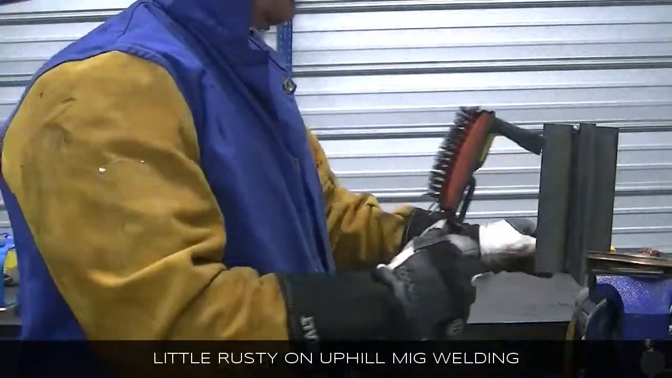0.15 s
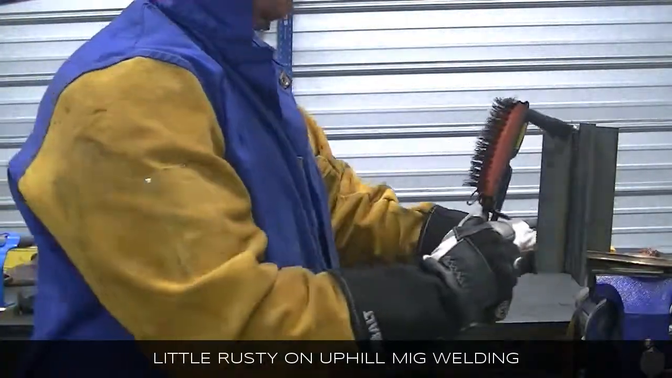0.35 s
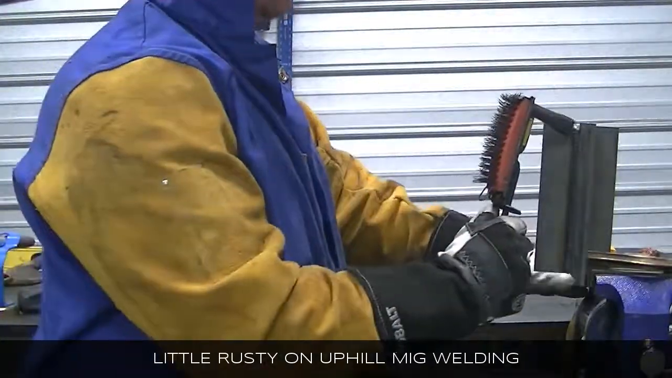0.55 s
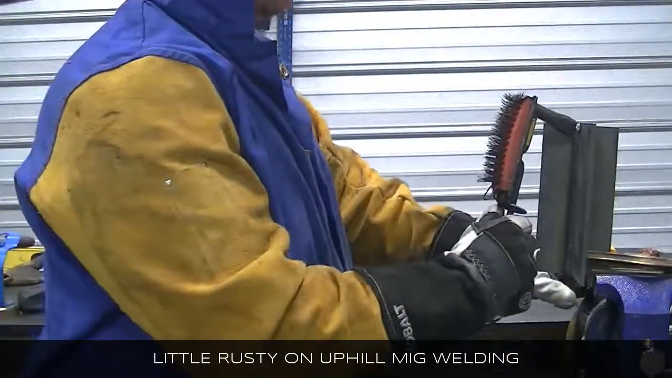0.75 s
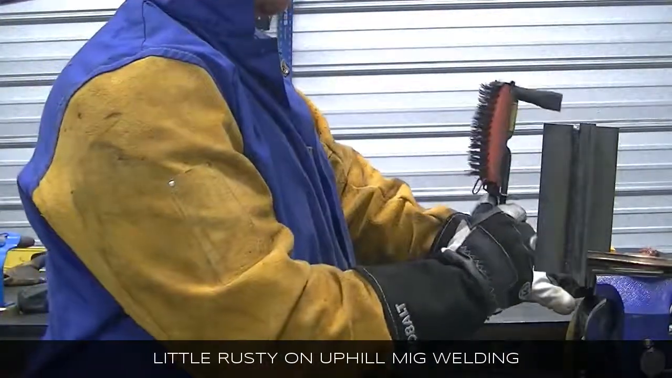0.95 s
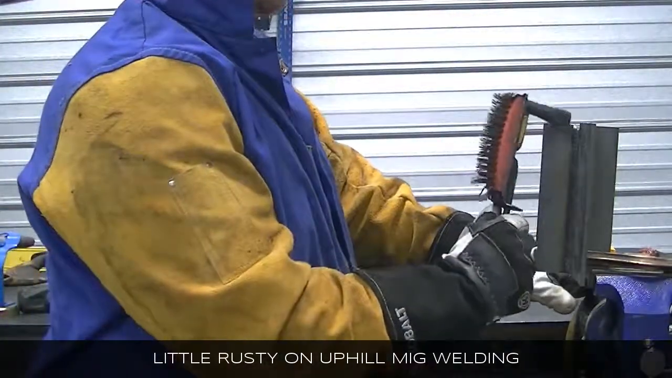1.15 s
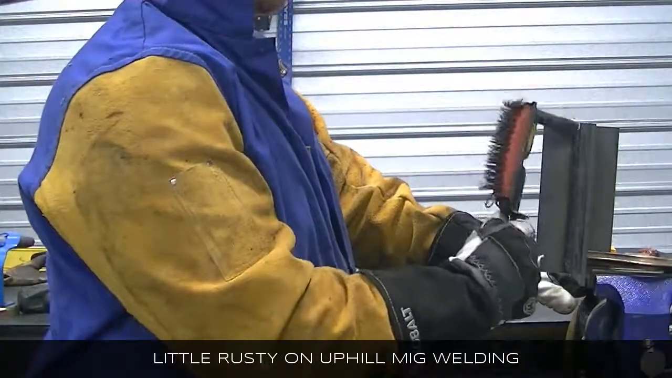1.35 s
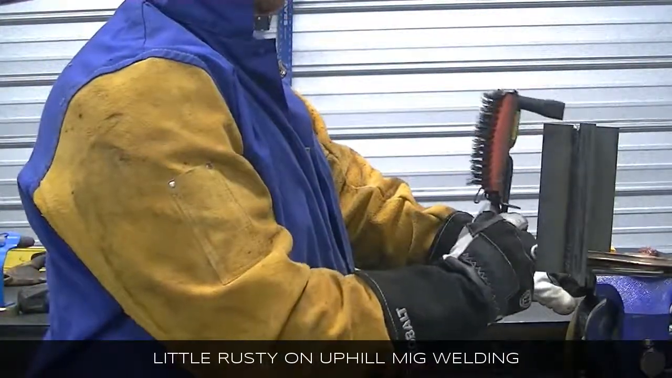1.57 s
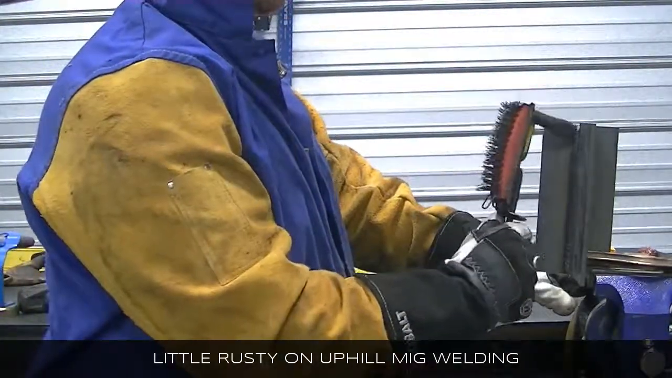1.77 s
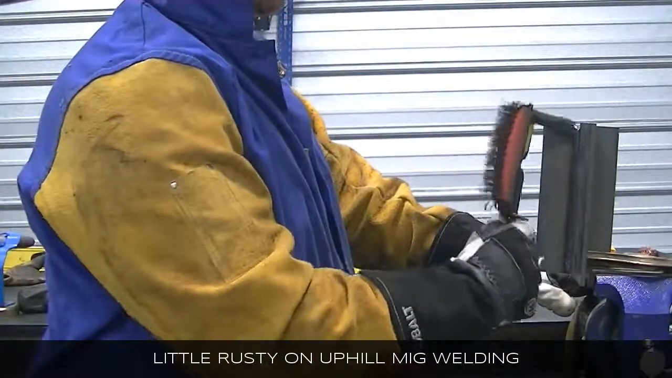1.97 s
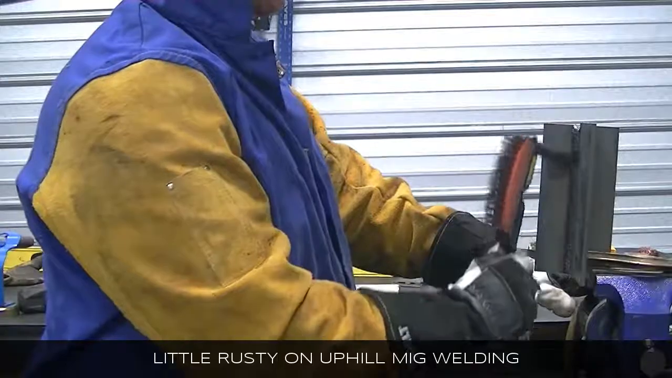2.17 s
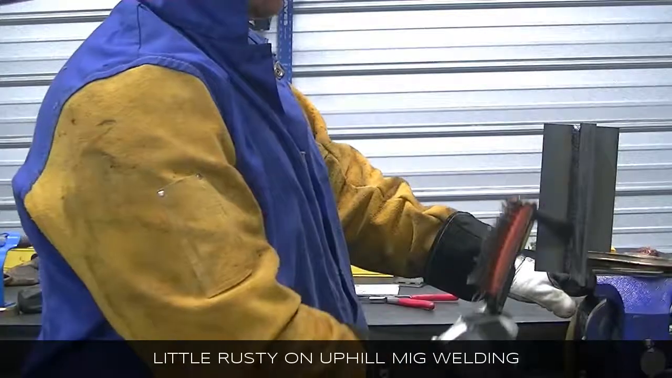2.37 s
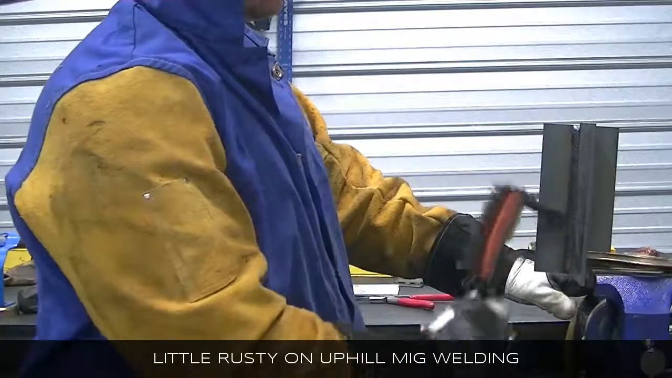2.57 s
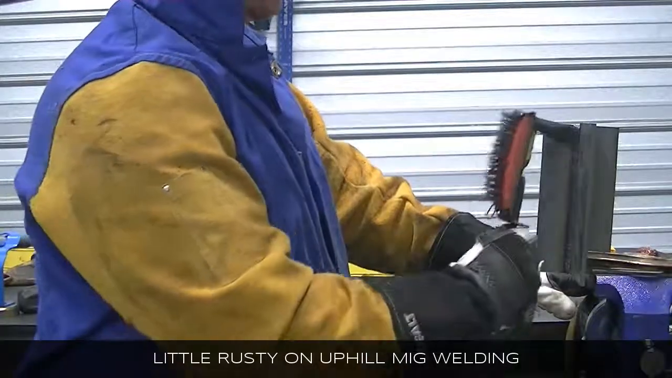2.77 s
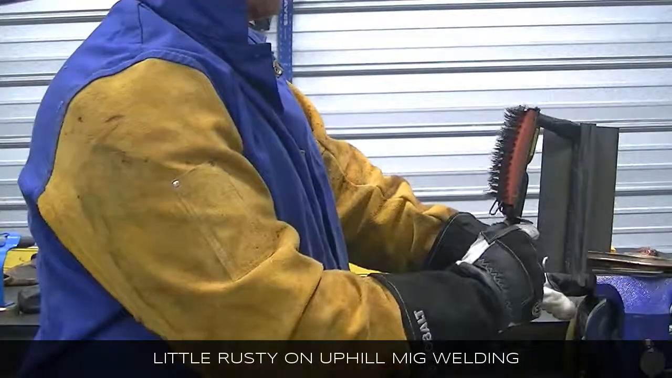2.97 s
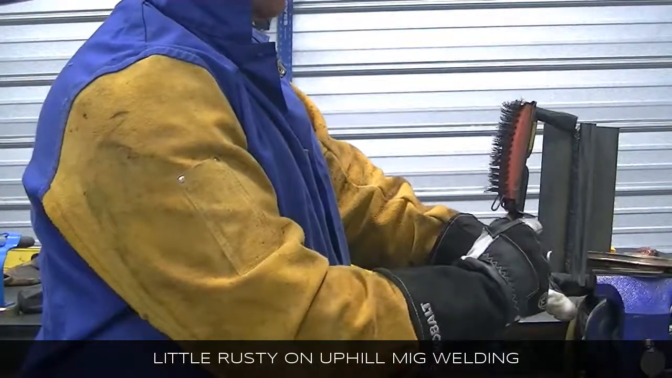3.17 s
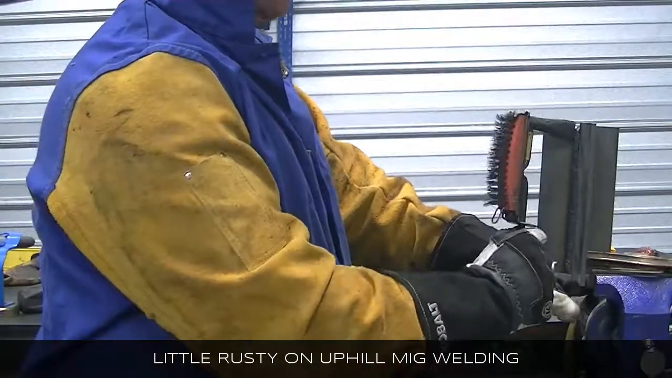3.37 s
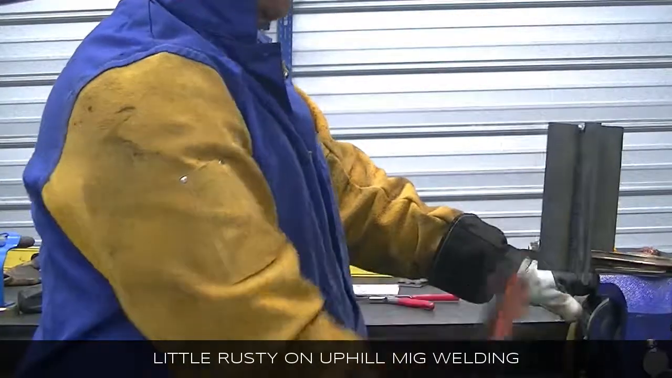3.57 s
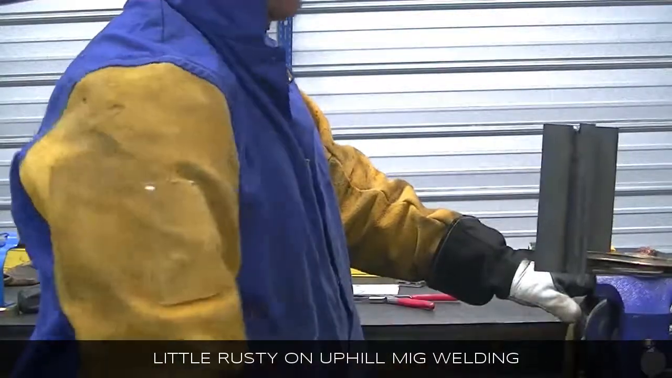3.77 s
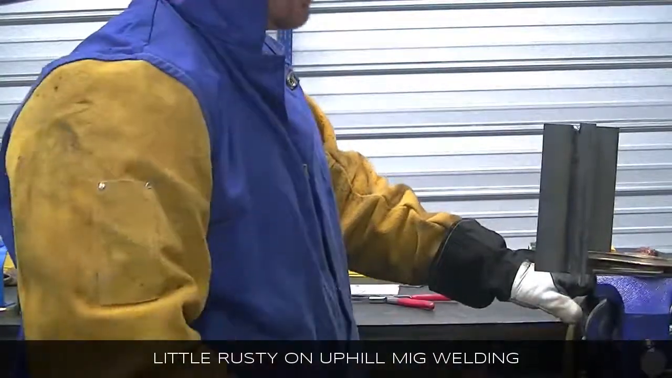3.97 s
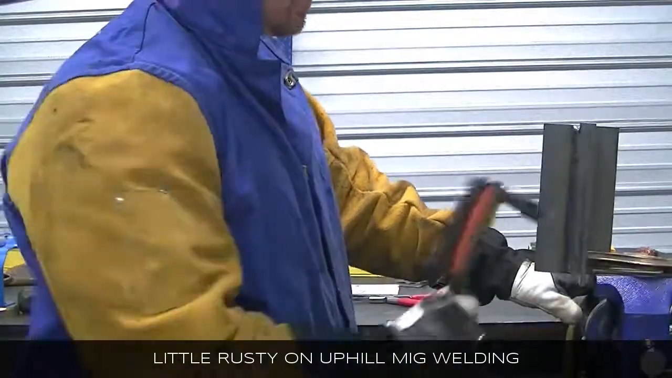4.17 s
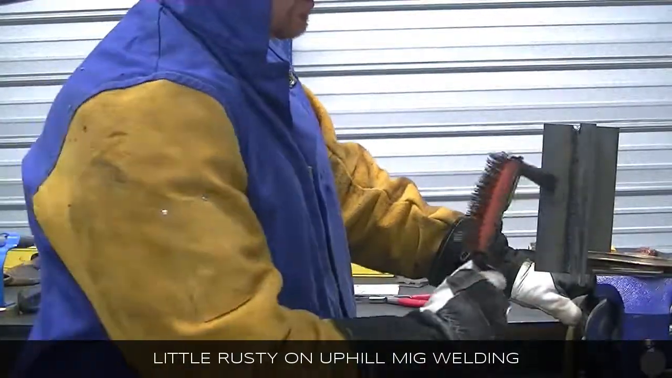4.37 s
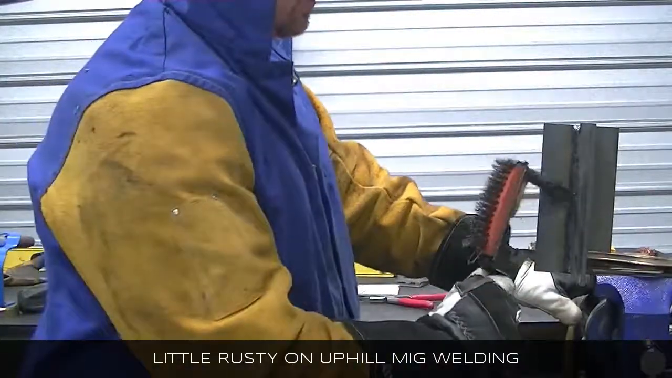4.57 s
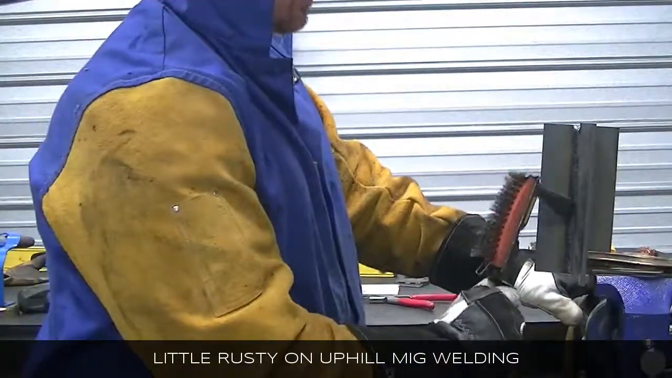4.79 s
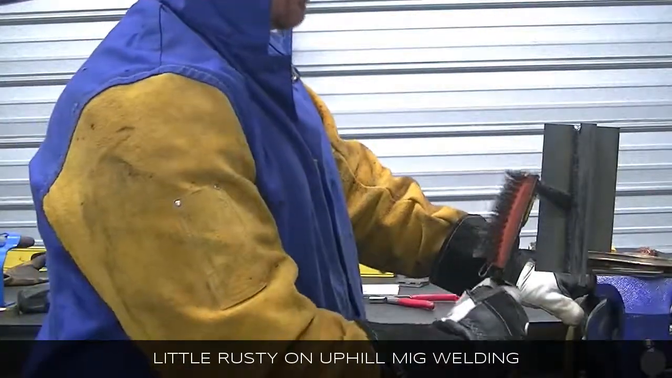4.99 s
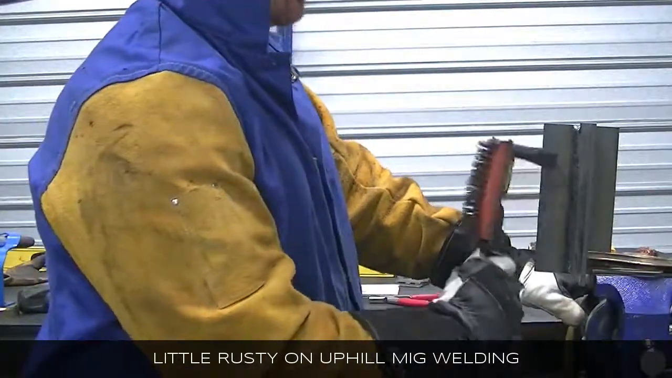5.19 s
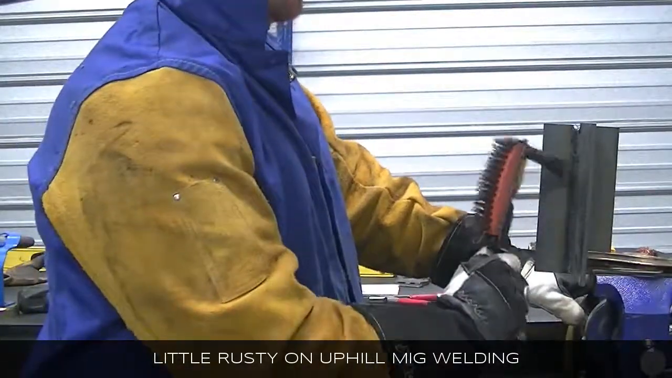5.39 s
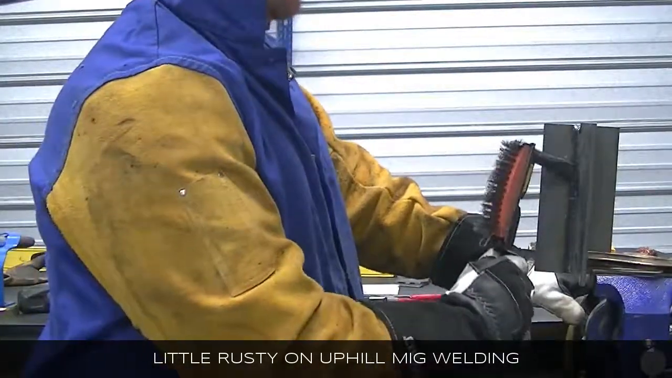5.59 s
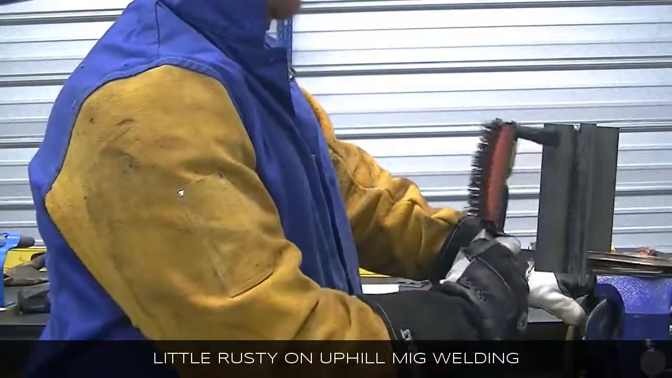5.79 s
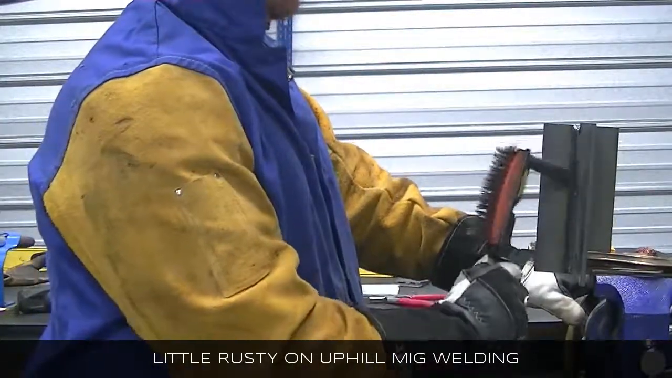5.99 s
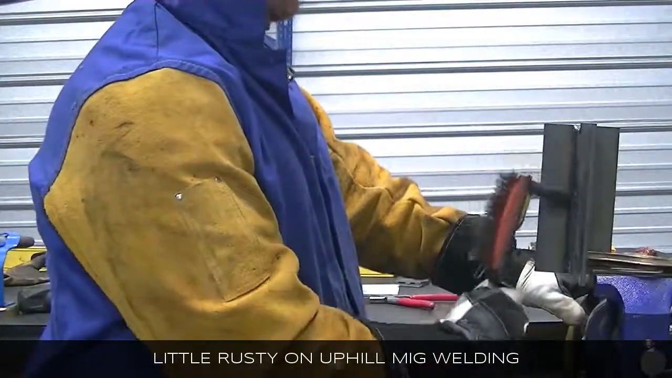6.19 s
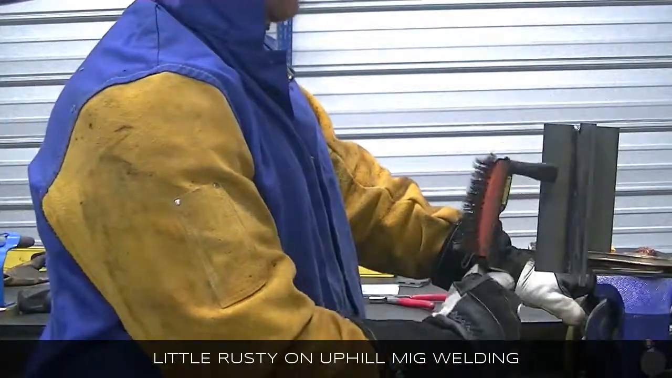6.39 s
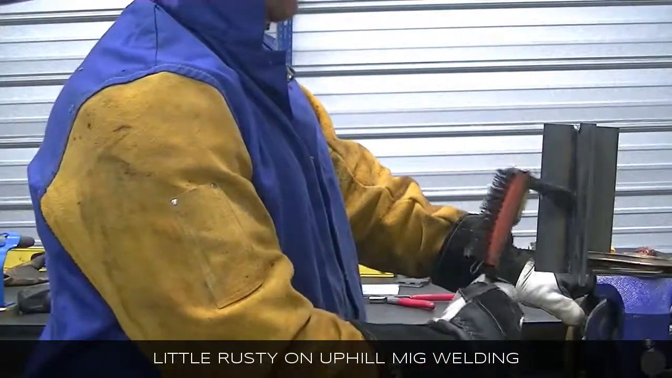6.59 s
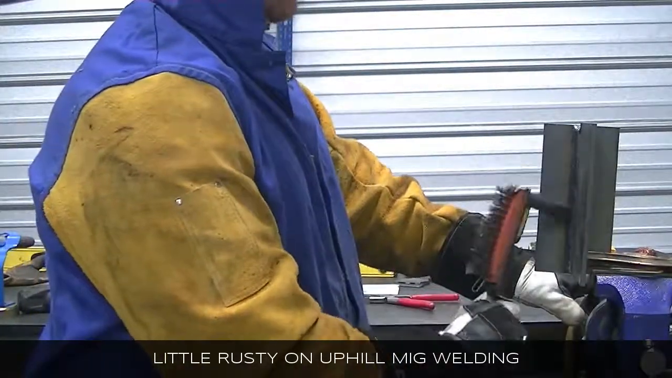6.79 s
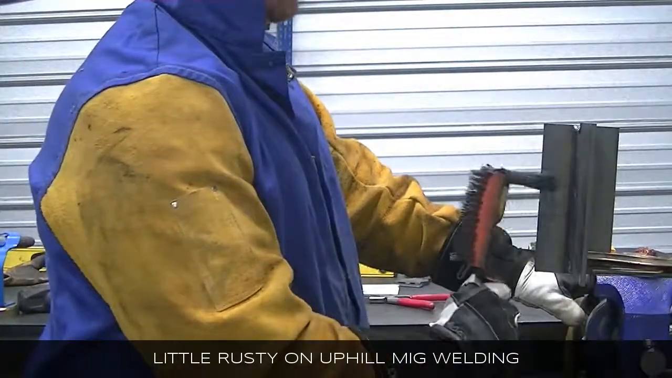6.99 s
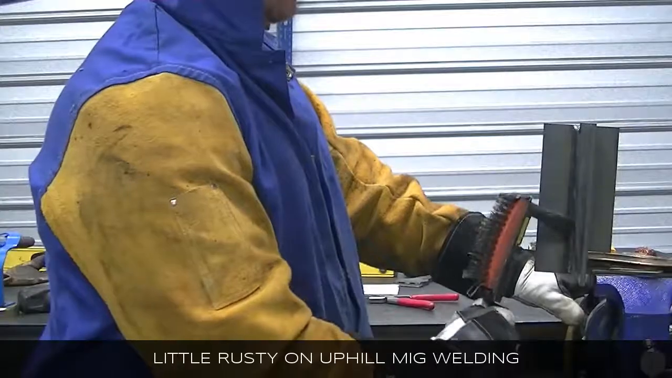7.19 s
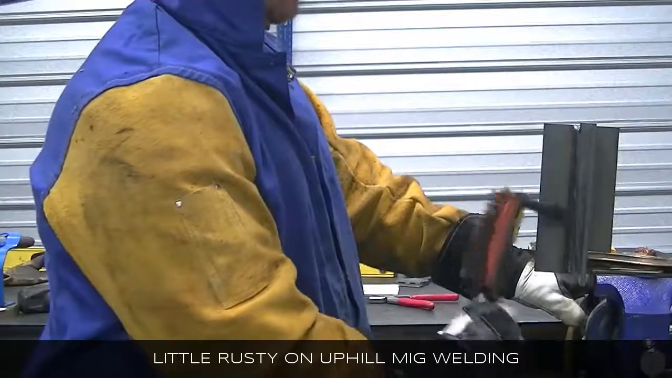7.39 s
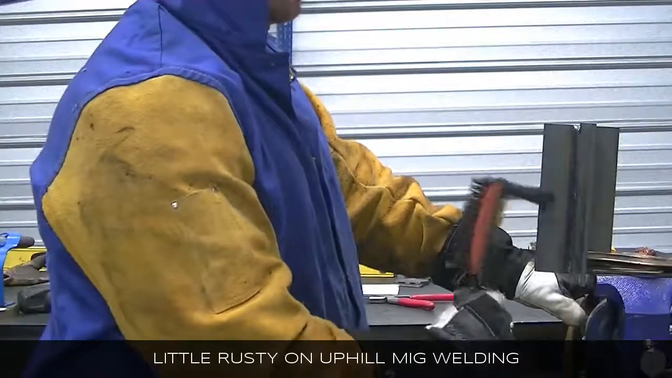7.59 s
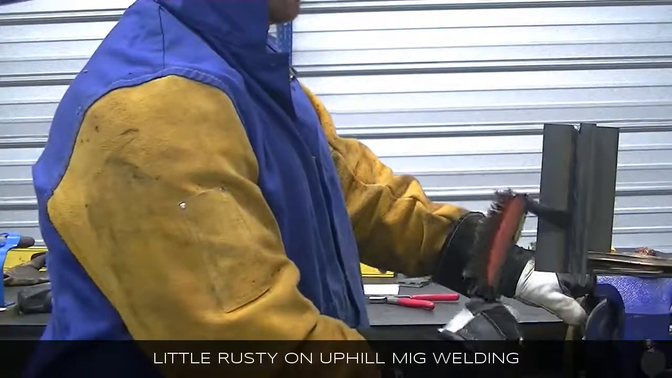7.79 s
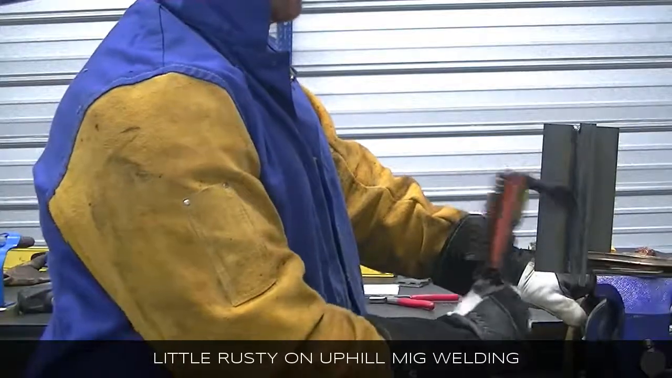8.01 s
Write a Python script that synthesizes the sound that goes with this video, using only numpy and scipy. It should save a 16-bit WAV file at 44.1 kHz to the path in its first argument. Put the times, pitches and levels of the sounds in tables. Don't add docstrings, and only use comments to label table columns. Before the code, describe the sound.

Close, hard clanks of steel on steel, each with a sharp crack, short dull thud and clangy ring. Four blows come first, followed by two rough dragging scrapes, sprinkled slag chips and a short hiss of grains, then a long, regular run of taps with slight bounces and changing force. A lively, metal-walled workshop blurs the hits together; the small microphone sounds thin, with little bass.

```python
import sys
import numpy as np
from scipy import signal
from scipy.io import wavfile
from scipy.ndimage import uniform_filter1d

SR = 44100
rng = np.random.default_rng(int(sys.argv[2]) if len(sys.argv) > 2 else 0)


def unload_wav(signal):
    wavfile.write(
        sys.argv[1],
        SR,
        np.round(np.clip(np.atleast_2d(signal).T, -1, 1) * 32767).astype(np.int16),
    )


def undo_db(level):
    steps = np.asarray(level, float) / 20
    return 10 ** steps


N = 355005


def evened(x):
    return x / np.sqrt(np.mean(x ** 2) + 1e-20)


def read(points, hz):
    f, value = np.transpose(points)
    return np.interp(np.log(hz + 1), np.log(f + 1), value)


def colour(x, points):
    half = read(points, np.fft.rfftfreq(4096, 1 / SR)) * np.log(10) / 20
    full = np.concatenate([half, half[-2:0:-1]])
    taps = np.fft.ifft(np.exp(full - 1j * signal.hilbert(full).imag)).real[:2048]
    return signal.oaconvolve(x, taps / np.linalg.norm(taps))[:len(x)]


def train(times, sizes):
    out = np.zeros(N)
    np.add.at(out, (np.asarray(times) * SR).astype(int), sizes)
    return out


def ring(pitches, modes, times, blows_db, rubbing, spread_db):
    luck = rng.standard_normal((len(times), len(modes)))
    out = np.zeros(N)
    for hz, (db, t60), spot in zip(pitches, modes, luck.T):
        radius = 1000 ** (-1 / (t60 * SR))
        turn = 2 * np.pi * hz / SR
        push = train(times, undo_db(blows_db + spread_db * spot)) + rubbing
        resonance = [1, -2 * radius * np.cos(turn), radius * radius]
        out += undo_db(db) * signal.lfilter([.5, 0, -.5], resonance, push)
    return out


def crack(times, db, rubbing, points, fast_s, slow_db, slow_s):
    t = np.arange(4000) / SR
    shape = undo_db(-60 * t / fast_s) + undo_db(slow_db - 60 * t / slow_s)
    push = train(times, undo_db(db))
    burst = signal.oaconvolve(push, shape)[:N] * rng.standard_normal(N)
    all_round = push * np.linalg.norm(shape)
    return np.array([colour(burst + rubbing, points), colour(all_round + rubbing, points)])


# (frequency [Hz], density [dB per Hz])
AIR = [(12, -44), (20, -17.5), (48, -31.5), (124, -15), (440, -14.5), (535, -13.5), (670, -14.5), (816, -7),
       (888, -18.5), (1050, -13.5), (1600, -17.5), (8890, -28.5), (15200, -30), (16500, -39)]
FADE = [(59, -52), (100, -30), (285, -6), (983, -13), (1170, -9), (2570, -5), (7020, -13), (15100, -36),
        (16500, -45)]


def air():
    hush = undo_db(-70.5) * colour(rng.standard_normal(N), AIR)
    fade = undo_db(-59 + 1.5 - 60 * np.arange(N) / SR / 0.64)
    return hush + fade * colour(rng.standard_normal(N), FADE)


# (level
# [dB], t60 [s])
CLINK_HZ = [1020, 1790]
CLINK_RING = [(-1.6, 0.57), (0.65, .8)]
NICK_HZ = [4330, 4470, 4630, 4430]
NICK_RING = [(-5, .25), (3, .2), (-1, .25), (-2, .2)]
# (level [dB], t60 [s])
LEAN_S = [2.807, 3.341]
LEAN_DB = [-49, -39.5]
LEAN_HZ = [1160, 1220, 1405]
LEAN_RING = [(-1, 0.83), (-2.5, 0.51), (-5, .6)]


def touchdown():
    clink = ring(CLINK_HZ, CLINK_RING, [.371], -75, 0, .1)
    nick = ring(NICK_HZ, NICK_RING, [.668], -70, 0, .1)
    return clink + nick + ring(LEAN_HZ, LEAN_RING, LEAN_S, np.array(LEAN_DB), 0, 1.3)


# (time [s], force [dB], weight [dB], flange share [dB], bite [dB])
TOUCHES = [
    (0.3707, -64, 2.5, -1, -25),
    (0.6679, -51, 0, -24, 7),
    (2.806, -30, 0.5, -0.5, -27),
    (3.1092, -49.5, 2.5, -8.5, 6),
    (3.3398, -24.5, 0.5, -6, -37),
    (4.7109, -24, 3, -4, -29),
    (4.7172, -15, -0.5, -21, -30),
    (7.4132, -21.5, -3, 14, -24),
    (7.7243, -23.5, -26, 8, 8.5),
]
# (time [s], force [dB], weight [dB], flange share [dB], bite [dB])
BLOWS = [(1.041, -19.5, 1, -6.5, -13), (1.3427, -4.5, -2, -2.5, -20), (1.6407, -6.5, 1.5, 1, -7.5),
         (1.9826, -1.5, -1.5, -2.5, -12.5), (4.4611, -16.5, -1.5, -8, -7), (4.9836, -15, -4, -13, -6),
         (5.2674, -14.5, 1.5, -5, -2), (5.5491, -15.5, 0.5, -6.5, -1), (5.849, -3.5, 0.5, -3, -15),
         (6.1748, -7.5, 0.5, -4, -8), (6.4646, -9, 0, -0.5, -6.5), (6.765, -4, -0.5, -1.5, -10.5),
         (7.0843, -8.5, 0, -11, -7), (7.4064, -6, -0.5, -11, -6.5), (7.7297, -8.5, 0, -4.5, -15.5),
         (8.0362, -19.5, 6, 2, -2.5)]


def shares():
    s, force, weight, flange, bite = np.transpose(sorted(BLOWS + TOUCHES))
    hard = np.maximum(force + 21.5, 0)
    keen = bite + 10
    parts = {
        "crack": 0,
        "thud": 4.5 - 0.52 * hard + weight,
        "plate": 2 - 0.58 * hard + weight,
        "flange": flange,
        "edge": 0.5 + 0.18 * keen,
        "web": -1.5 + 0.14 * keen,
        "snap": bite,
        "tip": bite + 0.5,
        "head": -15 + .55 * keen,
        "shank": -14.5 + 0.35 * keen,
    }
    return s, {part: force + db for part, db in parts.items()}


def slips(per_s, spread_db):
    size = undo_db(spread_db * np.minimum(rng.exponential(1, N), 5)) * rng.choice([-1., 1.], N)
    return evened(size * (rng.random(N) < per_s / SR))


def stroke(rows, rub_db, follow):
    s, pressure_db, bite_db = np.transpose(rows)
    level_db = pressure_db + rub_db + follow * bite_db
    gain = undo_db(np.interp(np.arange(N) / SR, s, level_db, -200, -200))
    return uniform_filter1d(gain, size=400)


# (time [s], pressure [dB], bite [dB])
DRAGS = [
    [(2.1, -46, 10), (2.136, -28, 1), (2.3, -45, 12), (2.32, -26, 4), (2.332, -33, 2), (2.422, -28.5, -2),
     (2.444, -60, 27), (2.5, -38, -20)],
    [(3.28, -68, 9), (3.346, -34.5, 2.5), (3.408, -50, 6), (3.464, -29, -1), (3.482, -30, 7.5),
     (3.584, -19, 7.5), (3.596, -38, -4), (3.66, -39, 6)],
]
RUB_DB = [-0.9, -12, -9.5, -15.5]
RUB_BITE = [.01, .45, .9, 1.1]
# (rate [per s], spread [dB])
SLIPS = [(2500, 3.6), (2000, 3.8), (1600, 4), (1500, 4.2)]


def drags():
    rubs = []
    for db, follow, grain in zip(RUB_DB, RUB_BITE, SLIPS):
        gain = sum(stroke(rows, db, follow) for rows in DRAGS)
        rubs.append(gain * slips(*grain))
    return rubs


# (level [dB], t60 [s])
PLATE_HZ = [517, 637, 716, 782, 1030, 1125, 1163, 1187, 1230, 1271, 1318, 1355, 1401, 1468, 1707, 1803]
PLATE = [(-15.5, 0.32), (-10, 0.34), (-12.5, 0.29), (-8, 0.12), (-25, 0.87), (-43.5, 0.08), (-5.5, 0.22),
         (1.5, 0.17), (4.5, 0.15), (-21.5, 0.25), (4, 0.043), (-20.5, 0.2), (-14.5, 0.48), (-12.5, 0.24),
         (-22.5, 0.076), (-15.5, 0.27)]
BENCH_HZ = [152, 200, 255, 330]
BENCH = [(-7.5, 0.53), (-15.5, 0.17), (2.5, 0.042), (-11, 0.65)]


def plate_and_bench(s, hit, low, lower):
    belly_db = hit["plate"] - 29.0 + 6 * lower
    out = ring(PLATE_HZ[:1] + PLATE_HZ[4:], PLATE[:1] + PLATE[4:], s, hit["plate"] - 24, undo_db(-46.5) * low, 3.2)
    out += ring(PLATE_HZ[1:4], PLATE[1:4], s, belly_db, undo_db(-47) * low, 3.2)
    return out + ring(BENCH_HZ, BENCH, s, hit["thud"] - 39.5, undo_db(-66.0) * low, 3.2)


# (level [dB], t60 [s])
FLANGE_HZ = [2847, 2867]
FLANGE = [(-12, 0.27), (-4.5, 0.24)]
EDGE_HZ = [3131, 3451]
EDGE = [(-5, 0.049), (-4, 0.39)]
WEB_HZ = [4055, 4125, 4200, 4340, 4480, 4820]
WEB = [(-4, 0.019), (-5.5, 0.039), (-6.5, 0.027), (-23.5, 0.057), (-11.5, 0.05), (-32.5, 0.18)]
# (level [dB], t60 [s])
TIP_HZ = [5561, 6490, 7500, 7872, 8823]
TIP = [(-10.5, .04), (-0.5, 0.074), (-5, 0.015), (-11, 0.029), (-6.5, .04)]
HEAD_HZ = [9700, 10700, 11570, 12200, 12950, 13900, 14300]
HEAD = [(-7, 0.04), (-22.5, .04), (-3.5, 0.047), (-8.5, 0.035), (-14, 0.052), (-6, 0.08), (-13.5, .05)]
SHANK_HZ = [6417, 7412, 8980, 10620, 10810, 11000, 12040, 12390]
SHANK = [(-1, 0.18), (-7, 0.28), (1.5, 0.052), (4, 0.039), (-7, 0.031), (-7.5, 0.033), (-4.5, 0.068),
         (-17.5, 0.056)]
# (time [s], skew [dB])
SKEWED = [
    (5.267, 6),
    (5.849, 1),
    (6.765, -1.5),
    (7.406, 12.5),
    (7.73, 11),
]


def small_parts(s, hit, mid, upper, high, lower):
    skew = sum(db * (abs(s - at) < .004) for at, db in SKEWED)
    lip_db = hit["edge"] - 25 + 1.43 * skew
    rim_db = hit["edge"] - 25 + 3.5 * lower - 0.35 * skew
    out = ring(FLANGE_HZ, FLANGE, s, hit["flange"] - 10.0, undo_db(-32) * mid, .8)
    out += ring(EDGE_HZ[:1], EDGE[:1], s, lip_db, undo_db(-50) * mid, .8)
    out += ring(EDGE_HZ[1:], EDGE[1:], s, rim_db, undo_db(-37.0) * mid, .8)
    out += ring(SHANK_HZ, SHANK, s, hit["shank"] - 21 + 0.93 * skew, undo_db(-47) * high, 0.98)
    out += ring(WEB_HZ, WEB, s, hit["web"] - 6.0, undo_db(-26) * upper, 3.4)
    out += ring(TIP_HZ, TIP, s, hit["tip"] - 21.0, undo_db(-49) * high, 4.5)
    return out + ring(HEAD_HZ, HEAD, s, hit["head"] - 13, undo_db(-39) * high, 4.5)


# (frequency [Hz], density [dB per Hz])
BODY = [(120, -56), (220, -8), (450, -8.5), (700, -8.5), (1250, 0), (1900, -5.5), (3000, -32)]
GLOVE = [(100, -20), (200, -5.5), (450, -12.5), (800, -18), (1500, -33.5)]
# (time [s], level [dB])
BUMP = [
    (3.159, -57),
]


def dull_thuds(s, hit, low):
    body = crack(s, hit["thud"] - 16, undo_db(-16.0) * low, BODY, 0.013, -26, 0.015)
    return body + crack(*np.transpose(BUMP), 0, GLOVE, 0.033, -17.5, 0.081)


# (frequency [Hz], density [dB per Hz])
CRACK = [(150, -63.5), (250, -39), (1500, 1.5), (2400, -3.5), (2870, -2.5), (3300, -6.5), (4300, -6),
         (4900, -14), (6500, -20), (8000, -22), (11000, -42), (16000, -49)]
SNAP = [(3500, -29), (5500, 11), (7000, -4.5), (9000, -9.5), (11500, -10.5), (14000, -10), (16000, -32.5)]


def sharp_cracks(s, hit, mid, high):
    impact = crack(s, hit["crack"] - 8.5, undo_db(1.0) * mid, CRACK, 0.015, -13.5, 0.045)
    return impact + crack(s, hit["snap"] - 14, undo_db(-8.5) * high, SNAP, 0.016, -7.5, 0.083)


def steel():
    s, hit = shares()
    low, mid, upper, high = drags()
    lower = s > 6.0
    plate = plate_and_bench(s, hit, low, lower)
    rings = small_parts(s, hit, mid, upper, high, lower)
    return plate, rings, dull_thuds(s, hit, low), sharp_cracks(s, hit, mid, high)


# (frequency [Hz], level [dB])
WALLS = [(150, 0.44), (400, 0.99), (1040, 0.83), (2760, 1), (7280, 0.62), (14000, 0.44)]
WALL_COLOUR = [(150, 1.5), (500, 10.5), (1200, 4.5), (3000, 1), (8000, 4), (15000, -4.5)]


def echoes(build_s):
    taps = np.zeros(SR)
    at = np.arange(160, SR - 16, 16)
    taps[at + rng.integers(0, 16, len(at))] = rng.choice([-1., 1.], len(at))
    hz, t, z = signal.stft(taps, SR, nperseg=256)
    z = z * undo_db(read(WALL_COLOUR, hz)[:, None] - 60 * t / read(WALLS, hz)[:, None])
    build = 1 - np.exp(-np.arange(SR) / SR / build_s)
    tail = signal.istft(z, SR, nperseg=256)[1][:SR] * build
    return tail / np.linalg.norm(tail)


def walls(rings, cracks):
    out = signal.fftconvolve(rings, echoes(0.003))[:N]
    for k in range(3):
        share = np.sqrt(2 / 3) * np.cos(2 * np.pi * (.9 * np.arange(N) / SR + k / 3))
        out += signal.fftconvolve(cracks * share, echoes(0.018))[:N]
    return out


# (start [s], length [s], level [dB], fade [dB per s])
DUST = [
    (3.896, 0.33, -43, 81),
    (4.204, .08, -52, 215),
    (4.246, .19, -60.5, 4),
]


def trickle():
    t = np.arange(N) / SR
    gain = sum(undo_db(db - fade * (t - s)) * (t > s) * (t < s + length) for s, length, db, fade in DUST)
    return uniform_filter1d(gain, size=400)


# (time [s], level [dB])
CHIPS = [(2.14, -29), (2.172, -35), (2.2179, -43), (2.3082, -28), (2.3176, -27), (2.3854, -23),
         (3.3039, -37), (3.4236, -28), (3.4522, -44), (3.4689, -20), (3.567, -28), (3.6207, -15.5),
         (3.8985, -22.5), (3.939, -24), (3.9574, -48.5), (4.0258, -27.5), (4.0494, -47), (4.078, -38),
         (4.193, -48.5), (4.2022, -30), (4.293, -40), (4.357, -41), (4.4104, -39.5), (6.0384, -30),
         (7.9094, -35)]
# (frequency [Hz], density [dB per Hz])
GRIT = [(2500, -49.5), (5000, -0.5), (8000, -2.5), (12000, -0.5), (16500, -2.5)]


def slag():
    s, db = np.transpose(CHIPS)
    tick = undo_db(-60 * np.arange(600) / SR / .004)
    ticks = signal.oaconvolve(train(s, undo_db(db - 10.0)), tick)[:N] * rng.standard_normal(N)
    grains = undo_db(-10.0) * trickle() * slips(7600, 1.7)
    return colour(ticks + grains, GRIT)


def scene():
    plate, rings, thuds, cracks = steel()
    chips = slag()
    wall_rings = plate + undo_db(-6.5) * rings + undo_db(-5) * cracks[0]
    wall_cracks = undo_db(3.0) * plate + undo_db(4) * thuds[1] + undo_db(-6.5) * cracks[1] + undo_db(-10) * chips
    direct = undo_db(-27.5) * plate + undo_db(-10.0) * thuds[0] + rings + undo_db(-1.0) * cracks[0] + chips
    work = direct + walls(wall_rings, wall_cracks)
    small = signal.butter(3, 170, "high", fs=SR, output="sos")
    return (signal.sosfilt(small, work) + air() + touchdown())[None]


def low_pass(x):
    return signal.sosfilt(signal.butter(12, 16800, fs=SR, output="sos"), x)


def record(dry):
    headroom = 1.4
    rounded = headroom * np.tanh(dry / headroom)
    thin = signal.sosfilt(signal.butter(1, 60, "high", fs=SR, output="sos"), rounded)
    thin = signal.sosfilt(signal.cheby2(8, 40, 16900, fs=SR, output="sos"), thin)
    return low_pass(thin)


dry = scene()
out = record(dry)
unload_wav(out)
```